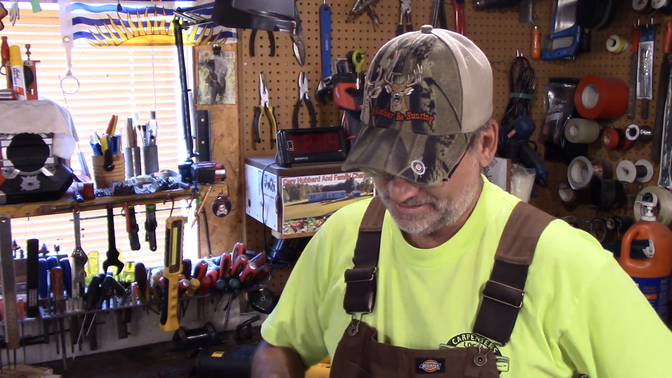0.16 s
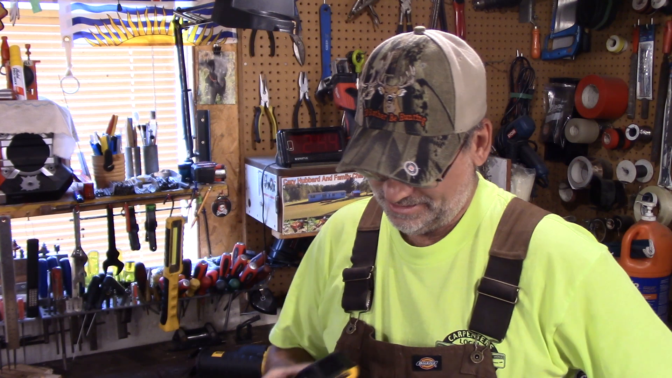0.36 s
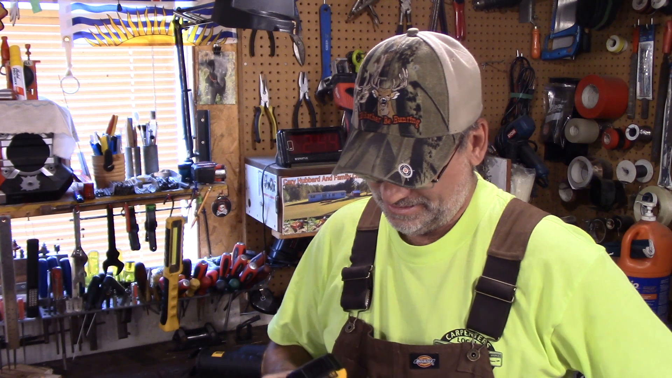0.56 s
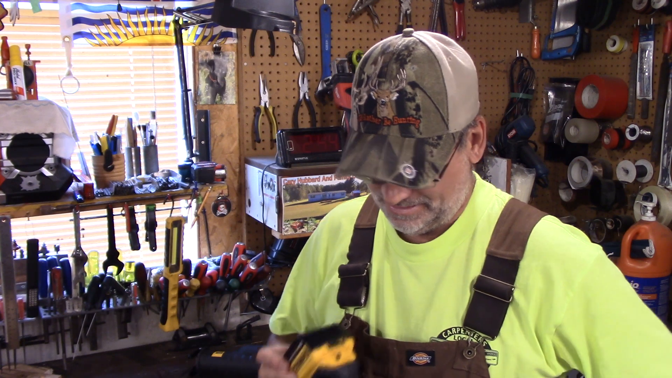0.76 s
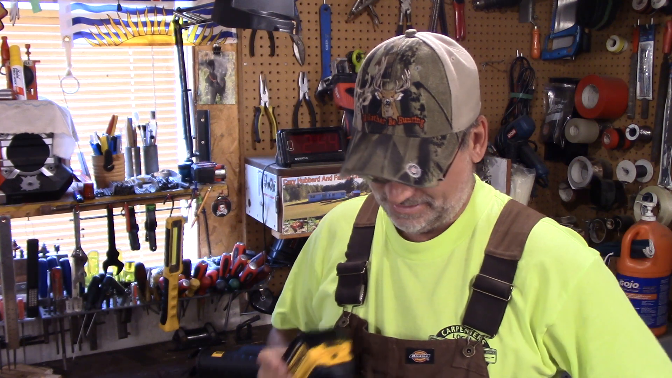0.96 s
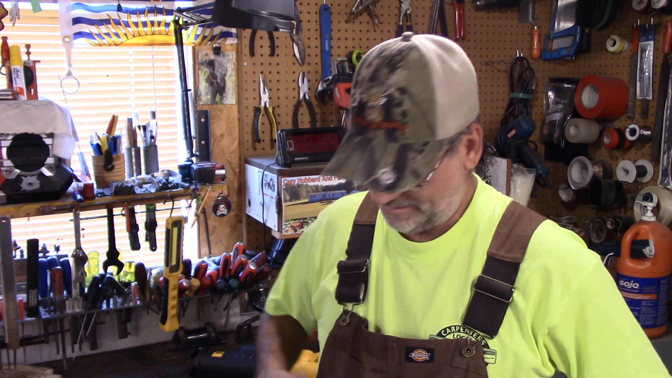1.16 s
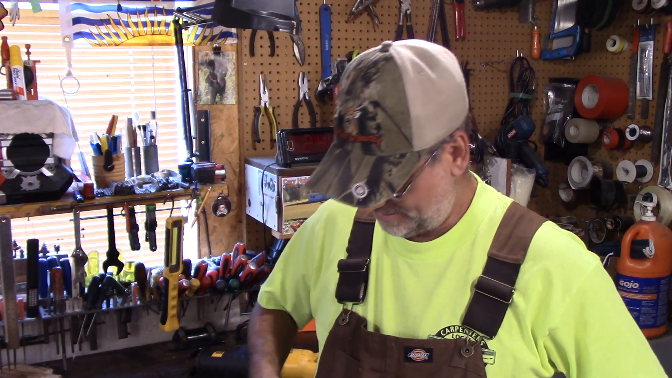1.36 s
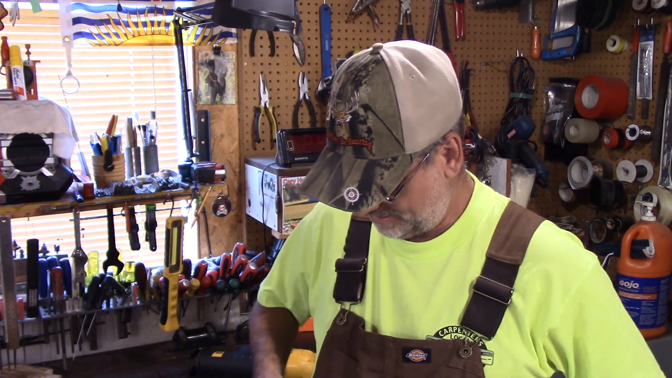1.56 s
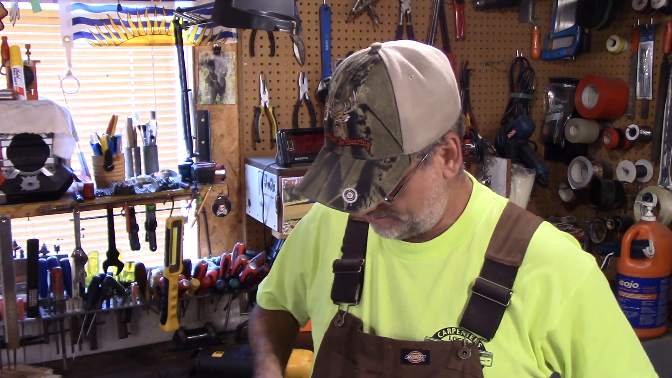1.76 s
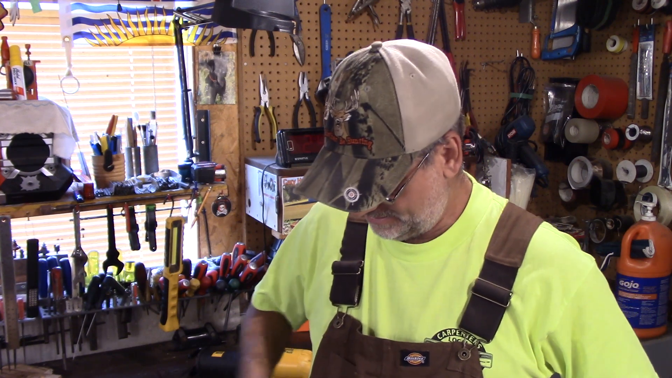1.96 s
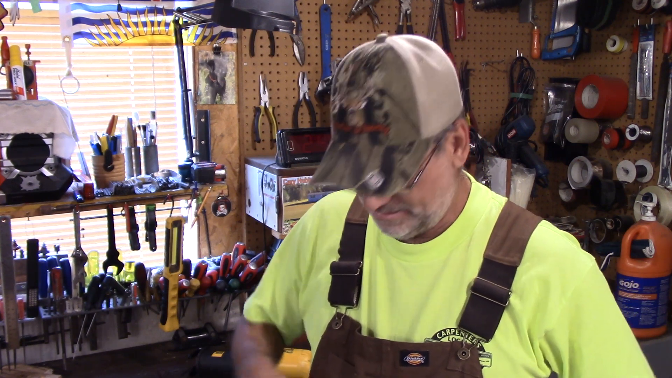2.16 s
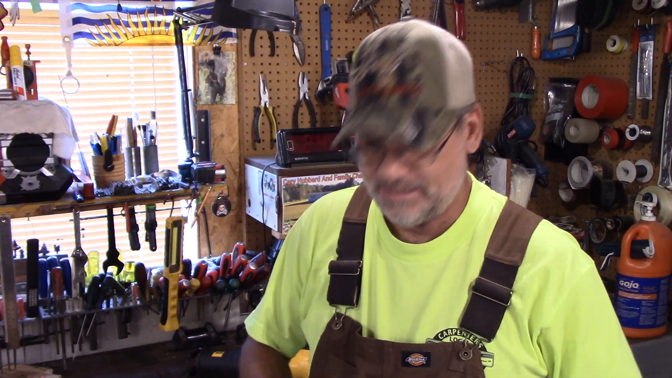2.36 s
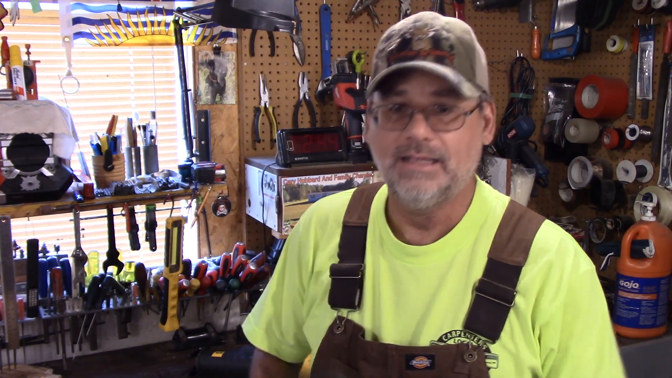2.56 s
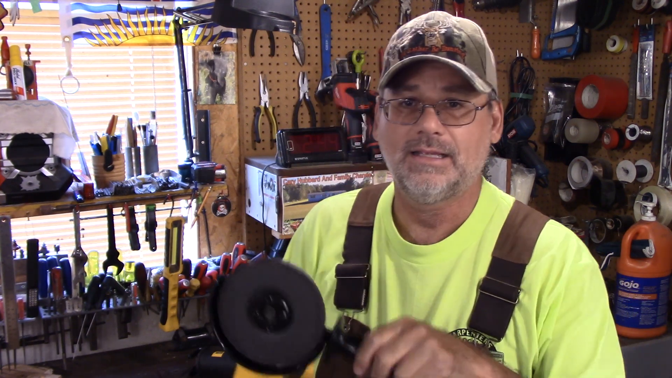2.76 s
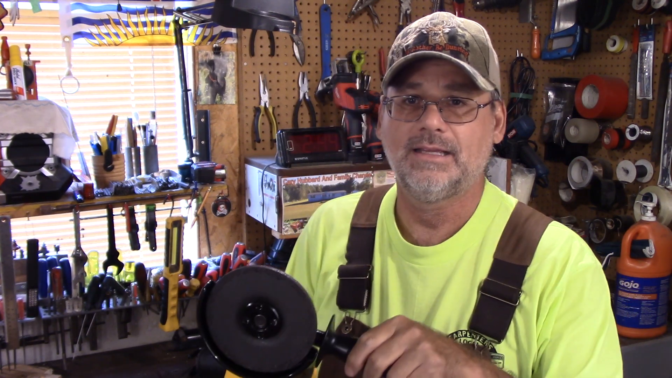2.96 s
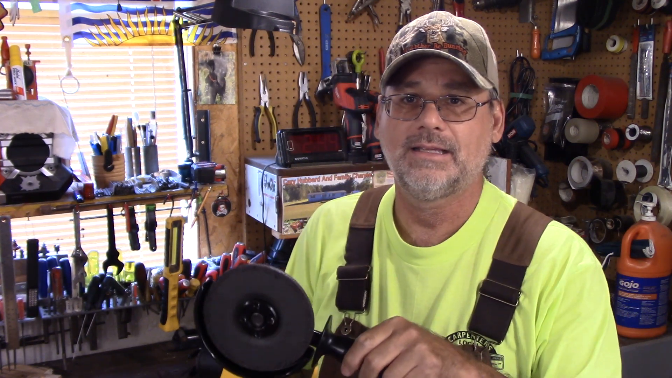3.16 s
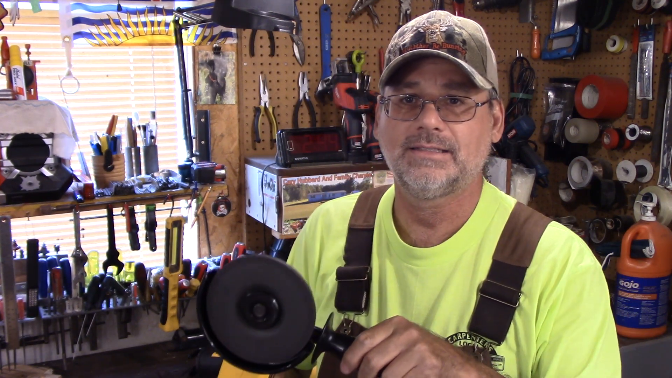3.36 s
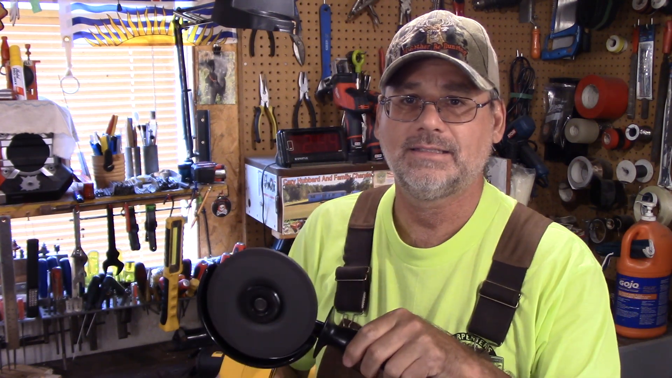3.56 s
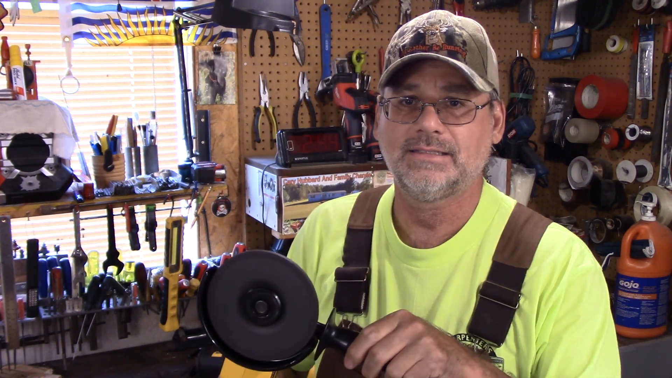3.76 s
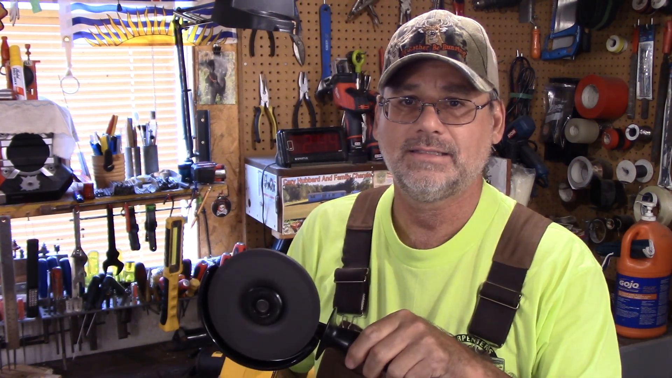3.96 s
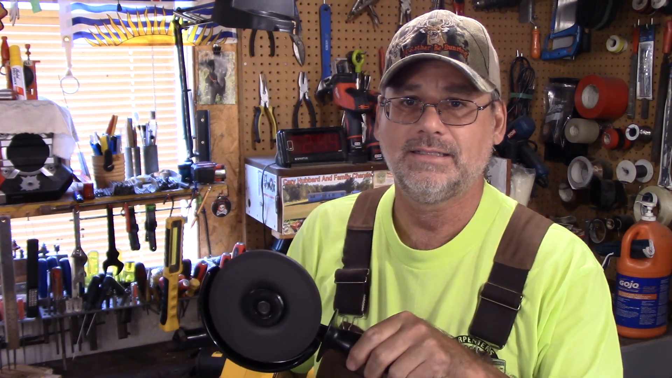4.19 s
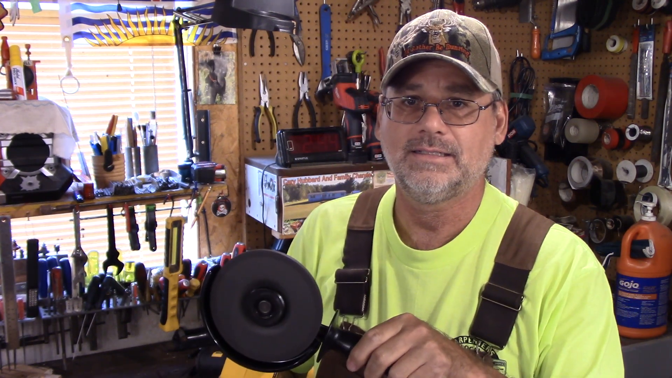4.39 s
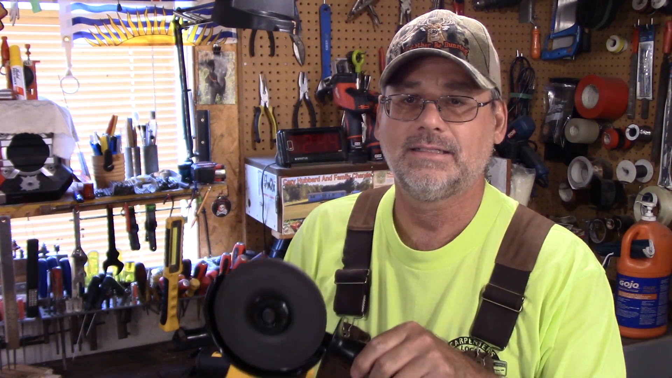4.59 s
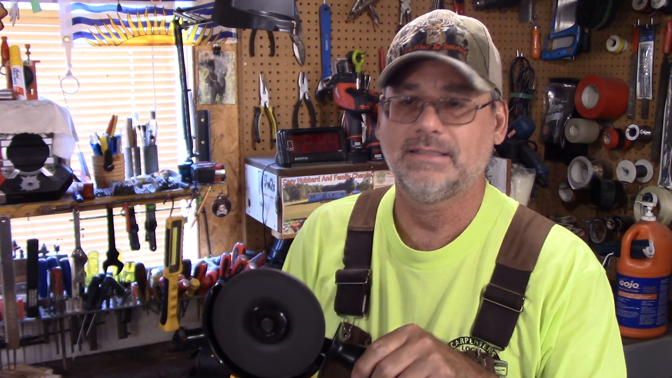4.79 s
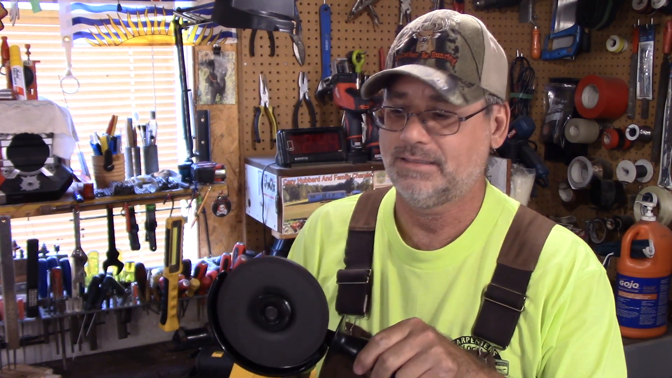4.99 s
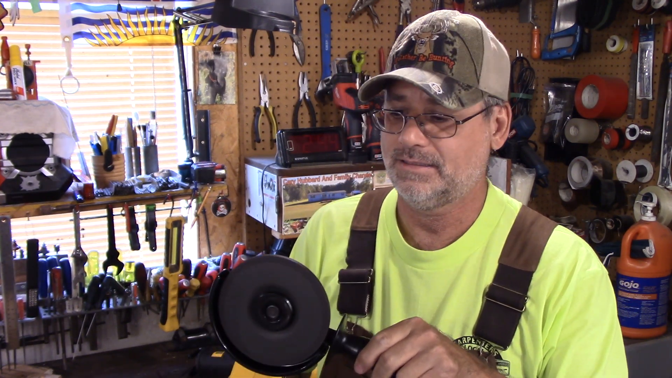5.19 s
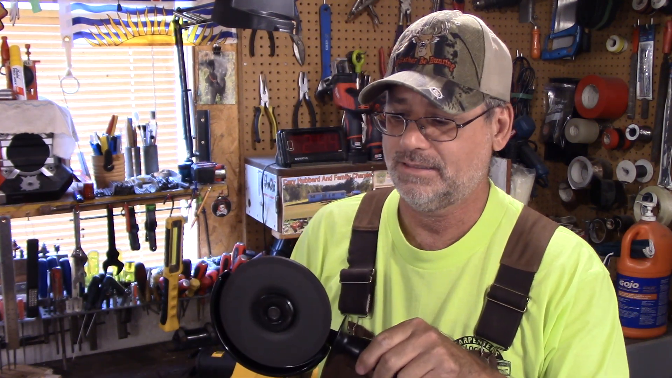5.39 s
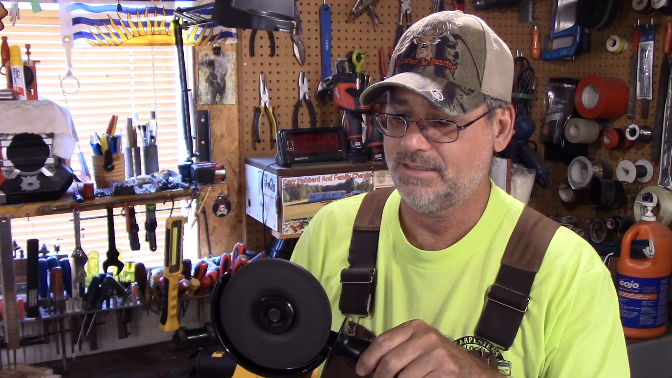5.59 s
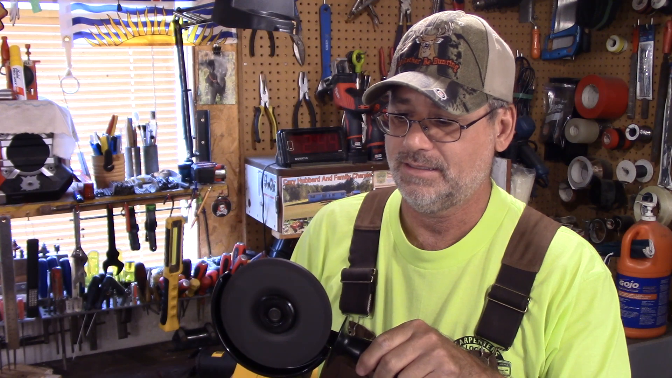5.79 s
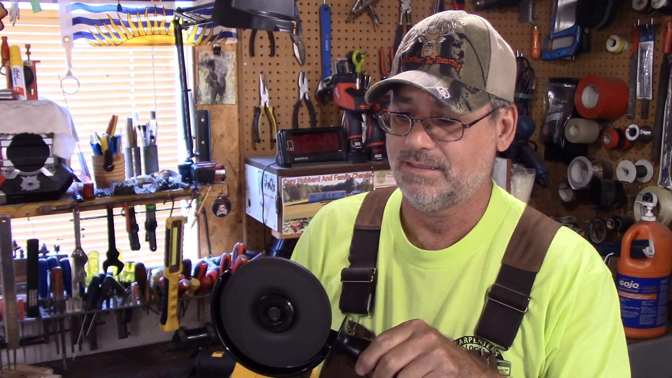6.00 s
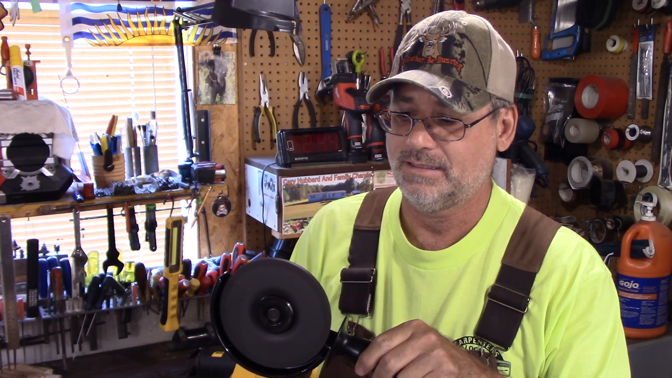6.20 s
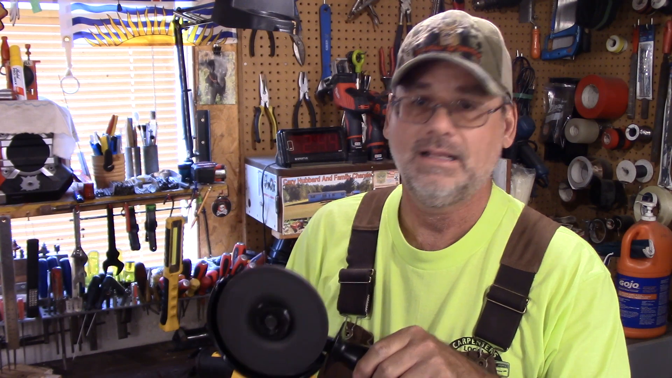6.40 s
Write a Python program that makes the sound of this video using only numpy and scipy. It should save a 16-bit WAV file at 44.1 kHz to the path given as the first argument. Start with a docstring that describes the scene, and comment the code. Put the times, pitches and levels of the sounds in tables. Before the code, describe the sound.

Faint room tone and hand rubbing on plastic with small taps, a crisp battery snap, then near silence. A double click starts an angle grinder: a growling lurch, a steeply rising whine, a steady harsh run with humming bearing and fan air. Power goes off, pitch slides down and loose gears chatter ever more coarsely until the end. Heard close and dry, with short small-room reflections.

```python
"""Angle grinder in a small workshop

A cordless grinder close to a nearly mono microphone: it is handled, the battery snaps home, the switch clicks.
The motor whines up to full speed and runs free, then coasts down against drag and dry friction.
Shaft speed drives noisy gear strikes, a humming bearing and whining sines; with the load gone the bevel
gears rattle in their play and ring the gear case. Filtered noise makes air, drone, rubbing and room tone;
knocks are noise cracks with ringing modes, and dense reflections make the room."""
import sys
import numpy as np
from scipy import signal
from scipy.fft import rfft, irfft
from scipy.io import wavfile
from scipy.ndimage import uniform_filter1d, minimum_filter1d

SR = 44100
rng = np.random.default_rng(int(sys.argv[2]) if len(sys.argv) > 2 else 0)


def int16_out(signal):
    """Quantize to a 16-bit WAV file."""
    q = np.round(np.clip(np.atleast_2d(signal).T, -1, 1) * 32767)
    wavfile.write(sys.argv[1], SR, q.astype(np.int16))


N = 284048
T = np.arange(N) / SR  # s
ON_S, OFF_S = 3.237, 4.495  # the motor gets current, and loses it again
FULL_SPEED = 398.8  # motor turns/s
STAGE_BLEND_S = 0.052  # time one stage takes to turn into the next
# stages of the gear play: held in mesh, chattering unloaded, coasting slaps, quicker slaps, continuous grind
# start_s, rattle_share (0-1), boom_db, ring_db, hard_treble_db (before the changes in gear_levels)
STAGES = [(3.2, 0.26, -27, -20, -28.5), (4.26, 1, -26.5, -18.5, -23.5), (4.48, 0.99, -26.5, -16.5, -16),
          (5.5, 0.96, -22.5, -13, -16), (5.99, 0.76, -15.5, -11.5, -17.5)]


def grinder(rise_s=0.052):
    """The shaft's speed drives gears, motor and fan; the body growls briefly during the run-up."""
    speed, torque = shaft()
    running = np.clip((T - ON_S) / rise_s, 0, 1)
    turns = np.cumsum(speed * (T > ON_S)) / SR
    return running * (gears(turns, torque) + motor(turns, speed, torque) + fan(turns) + body_growl())


def shaft(max_accel=1370, lag_s=.009, spin_up_s=.181, drag_s=1.891, friction=43.1):
    """Speed (turns/s) and torque (share of stall): a current-limited run-up, then drag and friction slow it."""
    # max_accel and friction are in turns/s per s; after switch-off torque keeps its last, almost zero value
    age = np.clip(T, ON_S, OFF_S) - ON_S
    approach = FULL_SPEED * (1 - np.exp(-(age - lag_s) / spin_up_s))
    driven = np.clip(approach, 0, max_accel * age)
    dry_friction = friction * drag_s
    speed = (driven + dry_friction) * np.exp(-np.maximum(T - OFF_S, 0) / drag_s) - dry_friction
    torque = 1 - np.maximum(driven, 1) / FULL_SPEED
    return np.maximum(speed, 1), torque


def gears(turns, torque, teeth=11, scatter_db=0.0, scrape=0.72, grind_db=4.5):
    """Teeth strike and scrape, ringing the case in three registers; the slaps gather this into bursts."""
    boom_db, ring_db, hard_db = gear_levels(torque)
    burst = slaps(turns) * undb(grind_db * walk(300))
    tooth_hits = np.diff(np.floor(teeth * turns), prepend=0)
    strikes = tooth_hits * rng.standard_normal(N) * undb(scatter_db * walk(3000))
    force = steady(strikes) + scrape * rng.standard_normal(N)
    # the high modes follow the slaps most closely
    boom = unit(case(steady(force * burst ** 0.5), 1693, 3020, -25.5)) * undb(boom_db)
    ring = steady(unit(case(force, 3600, 6190, -23.5)), size=110)
    ring = ring * steady(burst ** 0.52) * undb(ring_db)
    hard = steady(unit(case(force, 6330, 12300, -36.0)), size=70) * burst * undb(hard_db)
    sizzle = unit(colour(force * burst, [(5000, -30), (11000, 0), (15500, -2)])) * undb(hard_db - 25)
    return boom + ring + hard + sizzle


def slaps(turns, slap_s=0.0018, slip=.07, uneven_db=-1.0):
    """The loose crown wheel slaps against the pinion; each slap swells and dies within milliseconds."""
    # spacing of the slaps, one value for each stage: motor_turns
    spacing = [3.53, 3.53, 3.53, 2, 1]
    rows = [(s, min(rattle, 1), apart) for (s, rattle, *_), apart in zip(STAGES, spacing)]
    share, turns_apart = curves(rows)
    slap_phase = np.cumsum(np.diff(turns, prepend=0) / turns_apart)
    count = np.floor(slap_phase + slip * walk(70))
    age = T - np.maximum.accumulate(T * (np.diff(count, prepend=0) > 0))  # s since the last slap
    pulse = age / slap_s * np.exp(1 - age / slap_s) * undb(uneven_db * walk(110))
    return steady(1 - share + share * pulse)


def gear_levels(torque, db_per_octave=9.5, fade_db_per_s=17, waver_db=1.72):
    """Boom, ring and hard treble in dB: set by stage, raised by run-up speed and torque, faded in the last grind."""
    # change of boom, ring and hard treble at stall torque: level_db
    load_change = (35, 23.5, 21)
    _, *stage_db = curves(STAGES)
    spin_db = db_per_octave * np.log2(1 - torque)
    fade_db = fade_db_per_s * np.maximum(T - STAGES[-1][0], 0)
    return [db + spin_db + load_db * torque - fade_db + waver_db * walk(9.2)
            for db, load_db in zip(stage_db, load_change)]


def case(x, lo_hz, hi_hz, plate_db):
    """The gear case rings: its resonances over a broad plate response, within one register."""
    # gear case resonances: mode_hz, width_hz, level_db
    case_modes = [(1840, 64, 2.5), (2060, 53, -3.5), (2700, 87, -6.5), (2993, 76, -4), (3867, 300, -1),
                  (4170, 35, -1), (4600, 130, 5.5), (4760, 100, -8), (5570, 80, -17), (6810, 84, -10),
                  (7983, 430, 4), (9680, 370, -9.5), (11100, 360, -7.5)]

    def gain(f):
        """Power of modes and plate, cut off outside the register."""
        power = sum(undb(db) ** 2 / (1 + ((f - hz) / (width / 2)) ** 2) ** 1.18
                    for hz, width, db in case_modes)
        return np.sqrt((power + undb(plate_db) ** 2) / (1 + (lo_hz / f) ** 20) / (1 + (f / hi_hz) ** 20))
    return shape(x, gain)


def motor(turns, speed, torque, hum_rough=0.18, whine_rough=0.9, lash_wobble=0.21, waver_db=1):
    """The bearing hums and the magnetic pull whines; gear play jerks the shaft and smears the whine."""
    # multiples of the shaft speed that whine: cycles_per_turn
    whine_orders = [9, 10, 18]
    # each multiple's level before speed and housing: driven_db, extra_at_full_current_db, coasting_db
    whine_levels = [(-25, 17, -25), (-31, 10, -26.5), (-33, 21.5, -23.5)]
    # how well the housing radiates the whine: pitch_hz, level_db
    housing = [(1000, -23), (1500, -13), (1900, 2), (2300, -2), (2950, -8.5), (3600, -2), (4300, 1),
               (4700, 8), (5200, -21), (6200, -18.5), (7200, -11)]
    # the hum dips briefly: middle_s, half_length_s, change_db
    hum_dips = [(3.805, 0.035, -6), (4.921, 0.029, -14), (5.084, 0.036, -6.5)]
    bearing_order = 2.72  # hum cycles per motor turn
    hum_db, hum_load_db = -19, -16  # torque presses the bearing tight and quietens it: change at stall
    hum_knee, hum_steep = 279, 12.6  # turns/s below which the hum dies away, steepness of that fall
    full_current_torque = 0.26  # share of stall torque at which the current limit is reached
    fade_db_per_octave = 3  # the whine is weaker the slower the shaft turns
    mesh_wobble = .08  # unsteadiness of the whine even in tight mesh, cycles

    bearing = 2 * np.pi * (bearing_order * turns + 0.0092 * walk(40))
    hum = (np.sin(bearing) + undb(-12.5) * np.sin(2 * bearing)) * (1 + hum_rough * walk(120))
    dips_db = sum(db * swell(s, half_s) for s, half_s, db in hum_dips)
    hum = hum * undb(hum_db + hum_load_db * torque + dips_db + waver_db * walk(11))
    hum = hum / (1 + (hum_knee / speed) ** hum_steep)

    lash = curves(STAGES)[0]
    current = np.minimum(torque / full_current_torque, 1)
    coasting = np.clip((T - OFF_S) / STAGE_BLEND_S, 0, 1)
    slowing_db = fade_db_per_octave * np.log2(speed / FULL_SPEED)
    housing_hz, housing_db = np.transpose(housing)
    whine = 0
    for order, (driven_db, current_db, coast_db) in zip(whine_orders, whine_levels):
        db = (driven_db + current_db * current) * (1 - coasting) + coast_db * coasting + slowing_db
        db = db + np.interp(np.log(order * speed), np.log(housing_hz), housing_db)
        jerk = (mesh_wobble + lash_wobble * lash) * walk(220)
        whine = whine + undb(db) * np.sin(2 * np.pi * (order * turns + jerk))
    return np.sqrt(2) * (hum + whine * (1 + whine_rough * walk(300)))


def fan(turns, flutter_db=1.5, chop=0.51):
    """Cooling air rushes through the vents, chopped by the shaft; the plastic body drones, low noise beneath."""
    # spectrum of the cooling air: pitch_hz, level_db (per Hz)
    air_colour = [(250, -32), (700, -0.5), (830, 4.5), (980, -8), (1200, 2), (1400, 2.5), (1600, 1.5),
                  (2100, 10), (2750, 2), (3150, -1), (3600, 10), (4500, -3), (5300, -11.5), (15500, -16.5)]
    # spectrum of the body's drone: pitch_hz, level_db (per Hz)
    body_colour = [(25, -33), (120, -16), (200, -20), (260, -13.5), (315, 5), (370, -2), (450, 4.5),
                   (640, -4), (710, 12.5), (820, 5), (950, 15.5), (1300, -39.5)]
    # low noise added with the rattle share: pitch_hz, level_db (per Hz)
    low_colour = [(20, 0), (80, -0.5), (160, -3), (400, -14)]
    air_db, air_drop_db, body_db, body_drop_db = -32, 4, -37, 3  # driven level, drop when coasting
    fall_s, low_db = 0.15, -54
    slack = 1 - np.exp(-np.maximum(T - OFF_S, 0) / fall_s)
    rush = rng.standard_normal(N) * undb(flutter_db * walk(200))
    air = colour(rush * (1 + chop * np.sin(2 * np.pi * turns)), air_colour)
    air = air / band_level(air, 1133, 1720) * undb(air_db - air_drop_db * slack)
    body = colour(rng.standard_normal(N), body_colour)
    body = body / band_level(body, 280, 726) * undb(body_db - body_drop_db * slack)
    low_noise = unit(colour(rng.standard_normal(N), low_colour)) * undb(low_db) * curves(STAGES)[0]
    return air + body + low_noise


def body_growl(body_hz=785, wander=0.29, swell_half_s=0.016):
    """Brief swells near 785 Hz as the rising whine and hum pass the body's resonance: a rough, wandering sine."""
    # swells of the body's resonance: middle_s, level_db
    body_swells = [(3.241, -5.5), (3.297, -14), (3.355, -18.5)]
    envelope = sum(undb(db) * swell(s, swell_half_s) for s, db in body_swells)
    growl = np.sin(2 * np.pi * (body_hz * T + wander * walk(130)))
    return np.sqrt(2) * envelope * growl * (1 + 0.25 * walk(200))


def knocks(crack_t60=0.049, ring_db=-9, tick_db=2, tick_s=0.0016, size=18000):
    """Each knock is a tick and a short crack plus the shell's modes; returns direct sound and room send."""
    # knocks and switch clicks: start_s, level_db (before bass and treble), bass_db, treble_db, room_db
    blows = [(0.001, -27, 3, -5.5, 1.5), (0.238, -40, -12, 13.5, -5.5), (0.267, -40, 7.5, -24, 14),
             (0.276, -24.5, 6.5, -2, -6.5), (0.775, -39.5, 2, 17.5, -4.5), (1.022, -46, 13.5, -27, -6),
             (1.629, -41, 4, 0, 11), (1.641, -22, -16, -15, 8), (1.644, -7.5, -2.5, 6.5, -3),
             (1.652, -19, 10.5, -24, -8), (1.872, -48, -2, -10, -4), (1.944, -50.5, 6, -10, -5),
             (2.296, -37, 12, 1.5, -3), (2.542, -43.5, -17, -17, -1.5), (2.786, -42, 4, -12, -3),
             (3.148, -38.5, 9, -7, -1), (3.185, -10.5, -3, 3, -12), (3.236, -6, -3.5, -10.5, -5.5)]
    # what the tool rings with when knocked: mode_hz, level_db, t60_s
    shell_modes = [(354, -10.5, 0.12), (440, -18, 0.14), (790, 7, 0.045), (1120, -18, 0.099),
                   (1384, -10, 0.053), (1627, 4, 0.089), (1820, 2, 0.076), (2250, -11, 0.089),
                   (2880, -23, 0.55), (3430, -11, 0.06), (3760, -4, 0.2), (4680, -9, 0.098),
                   (5502, 0.5, 0.071), (5230, -31, 0.17), (6930, -15, 0.16)]
    # spectrum of the crack: pitch_hz, level_db (per Hz)
    crack_colour = [(30, -45), (170, -22.5), (310, -9.5), (550, -3), (900, -1), (1700, 3.5), (2800, -0.5),
                    (4700, -5), (5500, -5), (6300, -8), (8000, -12.5), (11000, -19), (15500, -26)]
    t = np.arange(size) / SR
    out = np.zeros((2, N + size))
    for s, db, bass_db, treble_db, room_db in blows:
        decay = undb(-60 * t / crack_t60) + undb(tick_db) * np.exp(-t / tick_s)
        crack = colour(rng.standard_normal(size) * decay, crack_colour)
        ring = sum(undb(g) * np.sin(2 * np.pi * (hz * t + rng.random())) * undb(-60 * t / t60)
                   for hz, g, t60 in shell_modes)
        blow = unit(crack) + undb(ring_db) * unit(ring * (1 - np.exp(-t / 0.0017)))
        blow *= undb(db) / np.sqrt(np.mean(blow[t < .006] ** 2))  # level of the first 6 ms
        blow = colour(blow, [(600, bass_db), (1400, 0.0034), (3000, 0), (7000, treble_db)])
        i = max(int(s * SR), 0)
        out[:, i:i + size] += blow * np.array([[1], [undb(room_db)]])
    return out[:, :N]


def hands(grain_db=3.5, bump_hz=272, bump_s=.014):
    """Skin and cloth rub unevenly over the plastic; padded bumps sound only one low mode."""
    # hands shifting on the grip, before the mix: middle_s, half_length_s, level_db
    grip_shifts = [(.05, 0.23, -60.5), (0.25, 0.043, -50), (.65, 0.24, -54.5), (1.017, 0.067, -59.5),
                   (1.24, 0.11, -53.5), (2.266, 0.24, -52.5), (2.29, .03, -55), (2.68, 0.094, -50.5),
                   (2.87, 0.13, -60)]
    # spectrum of the rubbing: pitch_hz, level_db (per Hz)
    rub_colour = [(150, -19), (400, 3), (900, 8), (1300, 1), (1750, 7.5), (2200, 3), (3500, 2),
                  (6000, -3.5), (11000, -5.5), (15500, -20)]
    # soft bumps of the tool against the body, before the mix: start_s, level_db
    soft_bumps = [(.935, -46), (1.09, -45)]
    grip = sum(undb(db) * swell(s, half_s) for s, half_s, db in grip_shifts)
    out = unit(colour(rng.standard_normal(N) * undb(grain_db * walk(180)), rub_colour)) * grip
    for s, db in soft_bumps:
        age = np.maximum(T - s, 0) / bump_s  # in swell times
        out = out + undb(db) * age * np.exp(1 - age) * np.sin(2 * np.pi * bump_hz * T)
    return out


def room(x, t60_low=0.26, t60_high=0.16, gap_s=0.0037, size=20000):
    """A small cluttered room: dense reflections whose treble dies sooner."""
    t = np.arange(size) / SR
    noise = rng.standard_normal(size)
    low = signal.sosfilt(signal.butter(1, 1500, fs=SR, output="sos"), noise)
    tail = low * undb(-60 * t / t60_low) + (noise - low) * undb(-60 * t / t60_high)
    tail = tail * (t > gap_s)
    return signal.fftconvolve(x, tail / np.sqrt(np.sum(tail ** 2)))[:N]


def shop(level_db=-56.5, tone_hz=5400, tone_db=-76):
    """Room tone of filtered noise with a thin, faint whistle standing in it."""
    # spectrum of the room tone: pitch_hz, level_db (per Hz)
    shop_colour = [(15, -58), (30, -33.5), (70, -14.5), (246, -7.5), (340, -11.5), (421, -6.5), (457, -9.5),
                   (509, -13), (895, -12), (1200, -15.5), (4150, -26), (5730, -29.5), (6210, -24.5),
                   (15500, -52)]
    tone = np.sqrt(2) * np.sin(2 * np.pi * (tone_hz * T + .2 * walk(60)))
    return unit(colour(rng.standard_normal(N), shop_colour)) * undb(level_db) + undb(tone_db) * tone


def undb(db):
    """Decibels to gain."""
    return 10 ** (np.asarray(db) / 20)


def unit(x):
    """Scale to rms 1."""
    return x / np.sqrt(np.mean(x ** 2))


def steady(x, size=2000):
    """Even out the power over a short window of samples."""
    return x / np.sqrt(np.abs(uniform_filter1d(x ** 2, size=size)) + 1e-4)


def swell(middle_s, half_s):
    """A bell-shaped rise and fall."""
    return np.exp(-((T - middle_s) / half_s) ** 2)


def walk(rate):
    """Smooth random wander with rms 1, taking about rate new values per second."""
    k = max(int(SR / rate), 2)
    steps = np.repeat(rng.standard_normal(N // k + 1), k)
    return unit(uniform_filter1d(steps, k)[:N])


def curves(table):
    """Each column of a table of stages, held from its start and blended into the next."""
    s, *columns = np.transpose(table)
    stage = np.maximum(np.searchsorted(s, T) - 1, 0)
    return [uniform_filter1d(c[stage], size=int(STAGE_BLEND_S * SR)) for c in columns]


def shape(x, gain, size=4096):
    """Causal minimum-phase filter, by folding the cepstrum of a gain given over frequency."""
    cepstrum = irfft(np.log(gain(np.linspace(1, SR / 2, size // 2 + 1)) + 1e-9))
    cepstrum[1:size // 2] *= 2
    cepstrum[size // 2 + 1:] = 0
    return signal.fftconvolve(x, irfft(np.exp(rfft(cepstrum))))[:len(x)]


def colour(x, points):
    """Filter by a spectrum of (Hz, dB) points."""
    hz, db = np.transpose(points)
    return shape(x, lambda f: undb(np.interp(np.log(f), np.log(hz), db)))


def band_level(x, lo_hz, hi_hz):
    """Rms of x inside one band."""
    f = np.arange(len(x) // 2 + 1) * SR / len(x)
    band = rfft(x)[(f > lo_hz) & (f < hi_hz)]
    return np.sqrt(2 * np.sum(np.abs(band) ** 2)) / len(x)


def scene():
    """Tool, hands and room tone at a nearly mono microphone; reflections and room tone give the width."""
    # left-right difference of the room's reflections: pitch_hz, level_db
    room_side = [(120, -29), (380, -63), (700, -29), (1300, -45), (2400, -24), (4400, -6.5), (8000, -13.5),
                 (14000, -41)]
    # left-right difference of the room tone: pitch_hz, level_db (per Hz)
    shop_side = [(25, -25), (60, -6), (130, 0.5), (500, 1), (3000, -13.5), (12000, -43)]
    tool = grinder()
    blows, sent = knocks()
    rubbing = hands()
    sent = sent + undb(-13.0) * tool + undb(-5.5) * rubbing
    mid = undb(2.5) * tool + blows + undb(-2.5) * rubbing + room(sent) + shop()
    side = colour(room(sent), room_side)
    side += unit(colour(rng.standard_normal(N), shop_side)) * undb(-63.5)
    return np.array([mid + side, mid - side])


def record(dry, top_hz=15950):
    """The microphone's limiter ducks smoothly around the highest peaks; the top is cut."""
    allowed = np.minimum(1, .95 / (np.abs(dry).max(axis=0) + 1e-9))
    gain = minimum_filter1d(allowed, size=201)
    gain = uniform_filter1d(uniform_filter1d(gain, size=101), size=101)
    return signal.sosfilt(signal.ellip(10, .1, 75, top_hz, fs=SR, output="sos"), dry * gain)


dry = scene()
out = record(dry)
int16_out(out)
```